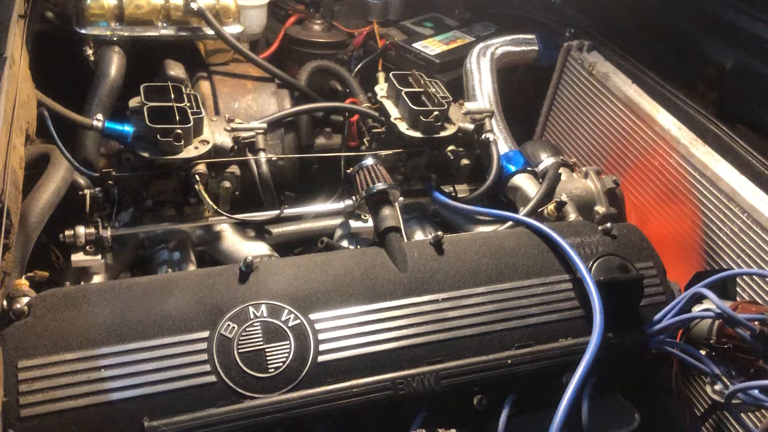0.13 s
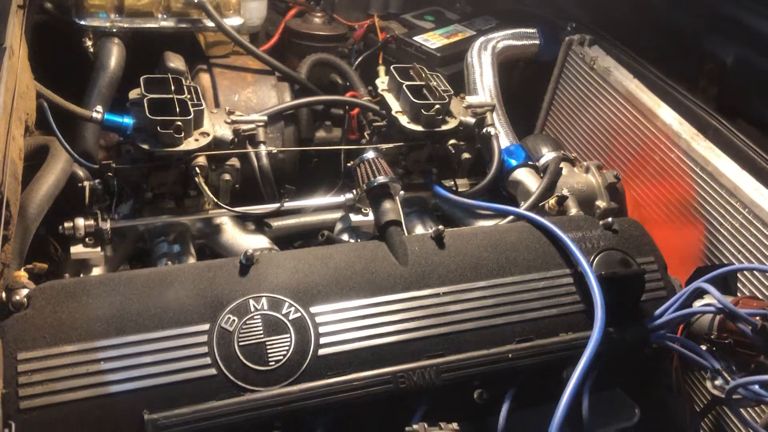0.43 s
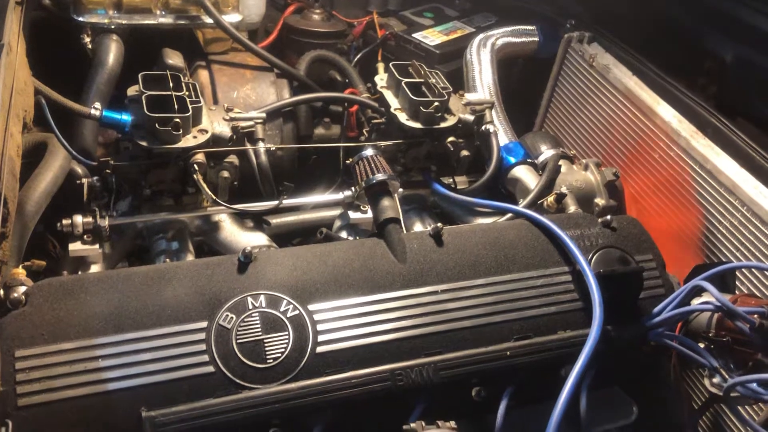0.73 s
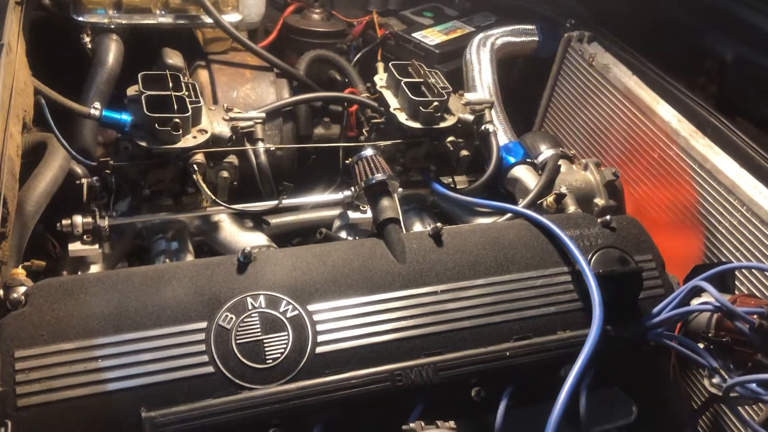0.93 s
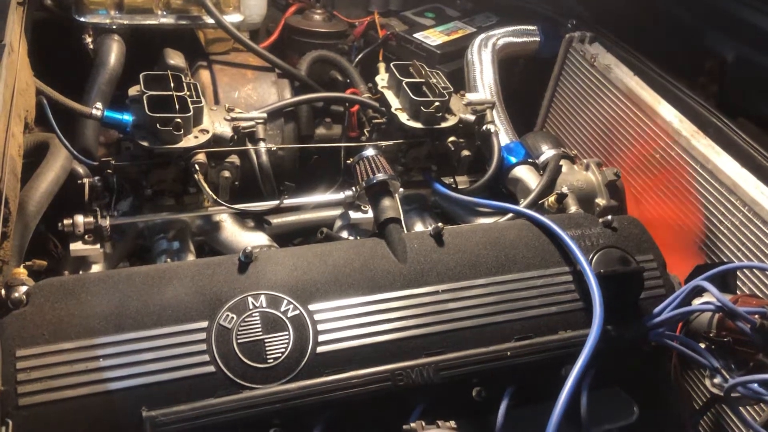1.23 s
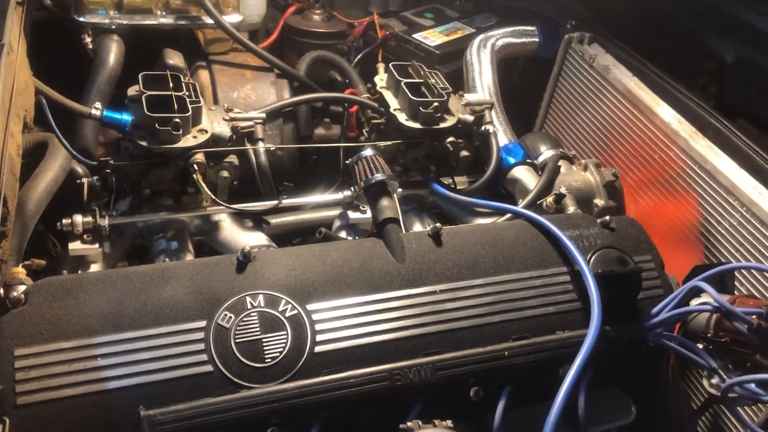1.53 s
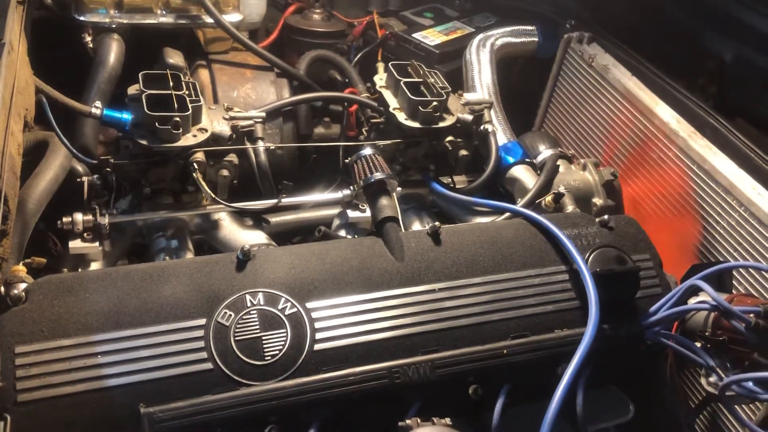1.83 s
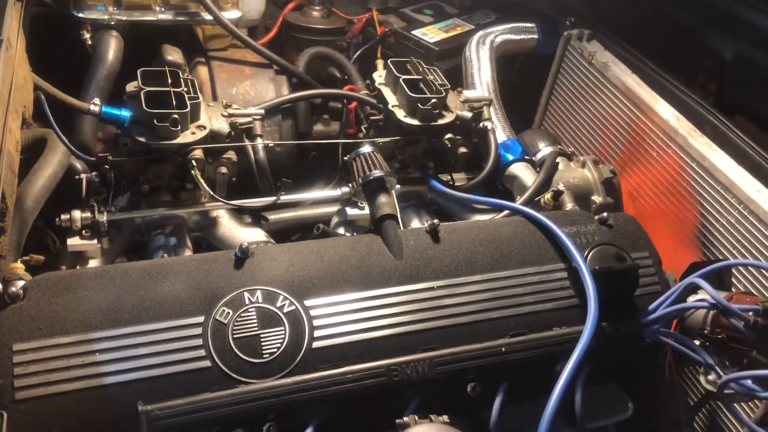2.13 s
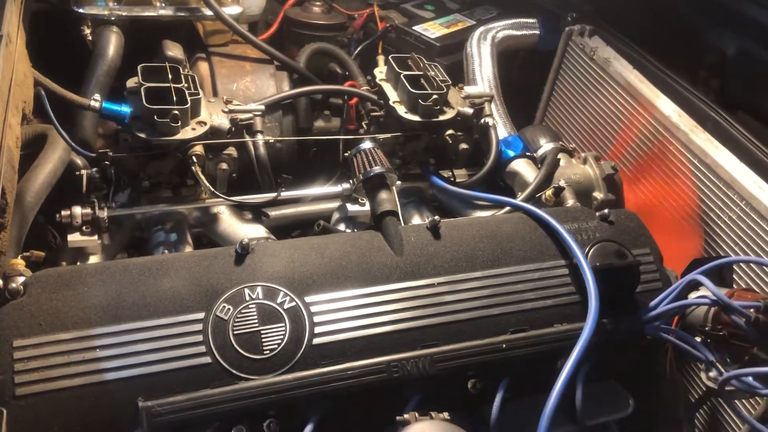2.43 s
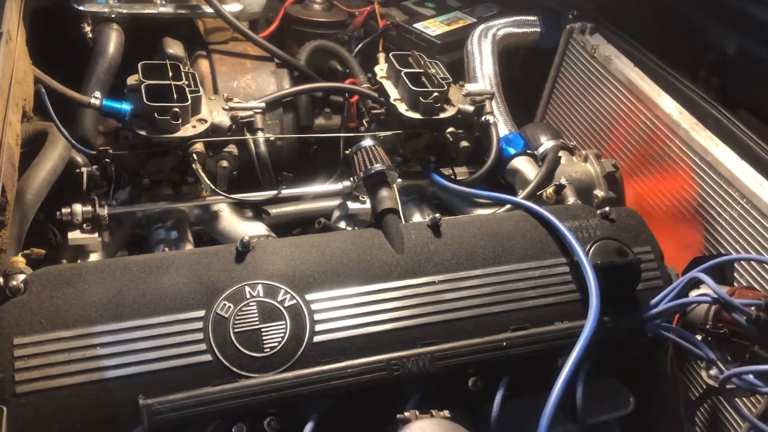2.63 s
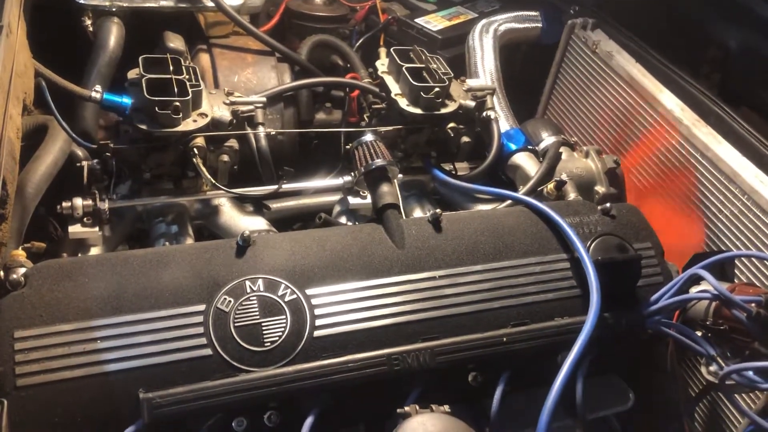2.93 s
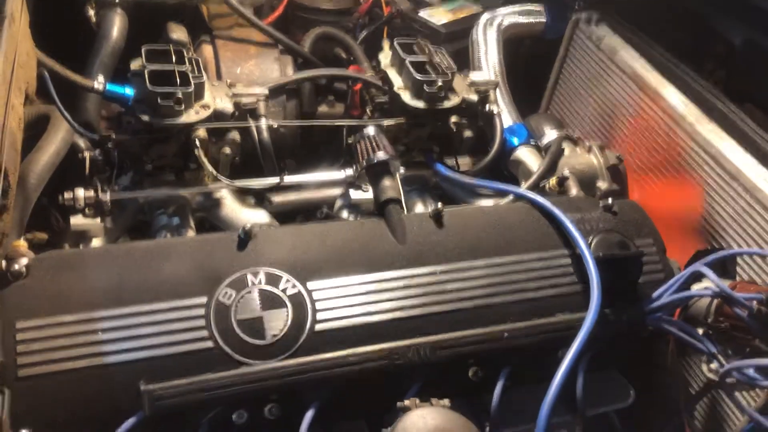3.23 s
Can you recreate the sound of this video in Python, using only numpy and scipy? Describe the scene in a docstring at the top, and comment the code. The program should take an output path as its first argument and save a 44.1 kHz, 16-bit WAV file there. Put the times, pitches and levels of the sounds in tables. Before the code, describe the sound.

Six-cylinder petrol engine idling unevenly, bassy and humming, with a loose tappet clicking steadily up close.

```python
"""After a moment of silence a six-cylinder petrol engine idles near 930 rpm, close over the open engine bay.
It sags deeply before 1 s and lightly near 2.2 s, recovers each time, runs fastest near 3 s and slows at the end.
Exhaust multiples throb in the bass, uneven pushes ring the bay, and panels hum at pitches of their own.
Noise bursts and ringing modes make the valve ticks, in a pattern that repeats every two crank turns, led by one
loose tappet; cam lobes rub with short, gritty chirps over the coloured noise of belts, fan and intake."""
import sys
import numpy as np
from scipy import signal
from scipy.fft import rfft, irfft
from scipy.io import wavfile
from scipy.ndimage import uniform_filter1d

SR = 44100
rng = np.random.default_rng(int(sys.argv[2]) if len(sys.argv) > 2 else 0)


def log_audio(samples):
    """Write samples as a 16-bit WAV file to the path given in sys.argv[1]."""
    # one column per channel
    frames = np.atleast_2d(samples).T
    # limit to full scale, then quantise
    limited = np.clip(frames, -1, 1)
    pcm = np.round(limited * 32767).astype(np.int16)
    wavfile.write(sys.argv[1], SR, pcm)


N = 149940
T = np.arange(N) / SR  # time, s

IDLE_RPM = 930  # nominal speed
THROB_AT = 0.587  # place of the strongest exhaust pulse in the cycle (0-1)
TICK_SAME = 0.31  # share of a tick's power that is the same on every blow

# swell of the bass and of the lower panel tones: start_s, level_db
BASS_LEVEL = [(0.15, 2.5), (0.45, -0.5), (0.68, 2), (0.76, -3.5), (0.84, 4.5), (1.1, 1), (1.3, 0.5),
              (1.5, 3), (1.6, 0.5), (1.72, 2.5), (2.0, 0), (2.25, 0.5), (2.45, 0.5), (2.7, 0.5),
              (2.9, -0.5), (3.2, 2), (3.3, -3.5), (3.38, 0.5)]


def undb(db):
    """Turns decibels into an amplitude factor."""
    return 10 ** (np.asarray(db) / 20)


def unit(x):
    """Scales a signal to rms 1."""
    return x / np.sqrt(np.mean(x ** 2))


def curve(points):
    """Joins (s, value) points by straight lines."""
    return np.interp(T, *np.array(points).T)


def walk(rate):
    """Random levels held about 1 / rate s and slewed twice; spread near 1."""
    hold = int(SR / rate)
    steps = np.repeat(rng.standard_normal(N // hold + 1), hold)
    slewed = uniform_filter1d(uniform_filter1d(steps, hold), hold)
    return 1.6 * slewed[:N]


def noise(points, tilt_db=0):
    """Noise of rms 1 with a colour of (Hz, dB) points, tilted per octave."""
    hz, db = np.array(points, float).T
    octave = np.log2(np.fft.rfftfreq(N, 1 / SR) + 1)  # + 1 Hz keeps the log finite
    gain = undb(np.interp(octave, np.log2(hz), db + tilt_db * np.log2(hz)))
    return unit(irfft(rfft(rng.standard_normal(N)) * gain, N))


def resonate(x, hz, width):
    """A steep resonance: one band-pass applied twice."""
    b, a = signal.iirpeak(hz, hz / width, fs=SR)
    return signal.lfilter(b, a, signal.lfilter(b, a, x))


def pulses(times, sizes):
    """One impulse per time."""
    out = np.zeros(N)
    inside = (times > 0) & (times < T[-1])
    np.add.at(out, (times[inside] * SR).astype(int), sizes[inside])
    return out


def passes(cycle, place):
    """The times at which the engine reaches one place in its cycle."""
    return np.interp(np.arange(-1, 28) + place, cycle, T)


def whirr(cycle, rpm):
    """Belts, fan and intake rush as coloured noise, pulsing slightly with the firings and following the speed."""
    # colour of the rush: pitch_hz, relative level_db
    rush_colour = [(200, -0.5), (400, 2.5), (500, 2), (660, -3), (810, 4.5), (960, -1), (1100, 3),
                   (1190, 4), (1270, 6), (1430, -2), (1620, 1), (1900, -6), (2050, -7), (2350, -9),
                   (2500, -5.5), (2750, -9), (3000, -9.5), (3800, -14), (5200, -16), (6800, -20),
                   (7250, -18), (7900, -24), (10600, -30), (11300, -26.5), (12000, -31), (13000, -40),
                   (15500, -41)]
    firing = np.cos(2 * np.pi * 6 * cycle)  # six firings a cycle
    speed_db = 0.014 * (rpm - IDLE_RPM)
    level_db = -35.5 + 0.5 * firing + speed_db + 0.8 * walk(70)
    return undb(level_db) * noise(rush_colour)


def panels():
    """Bonnet and panels ring at their own pitches whatever the speed; the upper ones swell and fade together."""
    # narrow ringing before the swell: pitch_hz, level_db (rms)
    panel_tones = [(121, -27.5), (168, -24.5), (260, -47), (285, -42.5), (336, -41.5)]
    # swell of the upper tones: start_s, level_db
    upper_swell = [(0.15, 2), (0.36, 6), (0.6, 0.5), (0.78, -13), (0.95, 3.5), (1.12, 2.5), (1.25, -5.5),
                   (1.47, 3.5), (1.7, -4), (1.87, -3.5), (2.0, 2.5), (2.2, -3), (2.4, 2), (2.64, 5.5),
                   (2.8, -6), (2.97, 1), (3.15, 5), (3.3, -2.5)]
    wander_hz, waver_db = 4, 2.4
    out = 0
    for hz, db in panel_tones:
        swell_db = curve(upper_swell if hz > 200 else BASS_LEVEL)
        turns = np.cumsum(hz + wander_hz * walk(44.93)) / SR + rng.random()
        level = undb(db + swell_db + waver_db * walk(25.09))
        out = out + np.sqrt(2) * level * np.sin(2 * np.pi * turns)
    return out


def boom(cycle):
    """Uneven firings and turbulent gas excite the resonances of the bay."""
    # air and panel resonances of the bay: pitch_hz, width_hz, relative level_db
    bay_modes = [(40.4, 12.3, -8), (63.2, 23.6, -3), (120, 24.3, 2), (143.6, 13, -14), (176.4, 25, -2),
                 (194.8, 9.6, -5.5), (228, 20, -17.5), (257.4, 15, -22), (291, 60, -29), (349, 43, -28)]
    boom_db, turbulence = -21.5, 0.7  # turbulence is its rms beside firings of rms 1
    times = np.concatenate([passes(cycle, THROB_AT + k / 6 - 1) for k in range(6)])
    firings = unit(pulses(times, rng.standard_normal(len(times))))
    push = firings + turbulence * rng.standard_normal(N)
    ringing = sum(undb(db) * resonate(push, hz, width) for hz, width, db in bay_modes)
    return undb(boom_db) * unit(ringing)


def cavity_db(hz):
    """How far the cavities lift a tone of this pitch."""
    # broad cavity resonances: pitch_hz, width_hz, lift_db
    cavities = [(123, 26, 5), (167.5, 22, 12)]
    return sum(db / (1 + (2 * (hz - centre) / width) ** 2) for centre, width, db in cavities)


def throb(cycle, rpm):
    """The steady part of the exhaust pulses: cycle-rate multiples that swell as they glide through the cavities."""
    # exhaust tones at idle speed, before the bass swell: multiple of the cycle rate, level_db (rms)
    exhaust_tones = [(6, -30.5), (8, -36.5), (12, -28), (14, -39), (15, -33.5), (16, -34), (18, -21),
                     (20, -41.5), (21, -22), (22, -29), (23, -38), (24, -39.5), (25, -45.5), (36, -58.5)]
    waver_db = 1.4
    out = 0
    for multiple, db in exhaust_tones:
        # a cycle is two crank turns, so its rate in Hz is rpm / 120
        lift_db = cavity_db(multiple * rpm / 120) - cavity_db(multiple * IDLE_RPM / 120)
        level = undb(db + lift_db + waver_db * walk(5.94))
        out = out + level * np.cos(2 * np.pi * multiple * (cycle - THROB_AT))
    return np.sqrt(2) * out


def cam(cycle):
    """Six times a cycle a lobe wipes its rocker with a brief, gritty chirp."""
    # cam lobe rubs: place in the cycle (0-1), pitch_hz, level_db before scatter
    lobe_rubs = [(.015, 1813, -38), (.2, 1785, -38), (.36, 1690, -39), (.555, 1803, -38.5),
                 (.71, 1698, -40.5), (0.894, 1846, -35.5)]
    rub_s, grit_share = 0.0027, 0.31  # width (sigma) of a wipe; grit beside a tone of rms 1
    window = signal.windows.gaussian(SR // 20 + 1, rub_s * SR)
    out = 0
    for place, hz, db in lobe_rubs:
        times = passes(cycle, place)
        wipes = pulses(times, undb(1.0 * rng.standard_normal(len(times))))  # 1 dB of scatter
        swell = signal.fftconvolve(wipes, window, "same")
        pitch = hz * (1 + 0.015 * walk(60))
        tone = np.sqrt(2) * np.sin(2 * np.pi * np.cumsum(pitch) / SR)
        grit = unit(resonate(rng.standard_normal(N), hz, 420))
        out = out + undb(db) * swell * unit(tone + grit_share * grit)
    return out


def blows(cycle, rpm, place):
    """One valve's blows: a little uneven, and harder when the engine runs faster."""
    scatter_db, jitter_s, db_per_rpm = 1.5, 0.0002, 0.0109
    times = passes(cycle, place)
    late, hard = rng.standard_normal((len(times), 2)).T
    speed_db = db_per_rpm * (np.interp(times, T, rpm) - IDLE_RPM)
    return pulses(times + jitter_s * late, undb(scatter_db * hard + speed_db))


def strike(hits, colour, envelope):
    """Blows that fade along an envelope: partly the part's own dense ring, partly fresh rattle."""
    ring = signal.fftconvolve(hits, envelope * colour[:len(envelope)])[:N]
    rattle = signal.fftconvolve(hits, envelope)[:N] * colour
    return np.sqrt(TICK_SAME) * ring + np.sqrt(1 - TICK_SAME) * rattle


def valves(cycle, rpm):
    """The lighter valves each give a short, bright tick: noise of their own colour with a fast rise and fade."""
    # valve ticks: place in the cycle (0-1), level_db before scatter, decay_ms, tilt in dB per octave
    valve_ticks = [(0.028, -35.5, 5, -4.5), (0.184, -36, 6.1, 2.5), (.215, -56, 2.6, -8),
                   (.325, -41.5, 3.9, -1), (0.354, -37.5, 3.5, 3.5), (.517, -48.5, 2.9, 2),
                   (.54, -41.5, 3.8, 11.5), (.63, -38.5, 7.6, -4), (0.684, -35.5, 6.1, 1),
                   (0.717, -33, 6.4, -5), (.853, -38, 3, -2), (.88, -37.5, 2.8, 1)]
    # shared colour of the ticks: pitch_hz, relative level_db
    tick_colour = [(500, -26), (1500, -1), (2600, 2.5), (3300, 3), (4300, -2.5), (5600, -1), (7200, -5.5),
                   (7900, -8), (8700, -6.5), (11500, -17), (13000, -21), (15500, -27)]
    rise_s = 0.00086
    age = T[:SR // 20]
    out = 0
    for place, db, decay_ms, tilt_db in valve_ticks:
        envelope = np.exp(-1000 * age / decay_ms) * (1 - np.exp(-age / rise_s))
        hits = blows(cycle, rpm, place)
        out = out + undb(db) * strike(hits, noise(tick_colour, tilt_db), envelope)
    return out


def tappet(cycle, rpm):
    """The loose tappet cracks once a cycle, spills into the bay and rings the decaying modes of the cam cover."""
    # colour of the crack: pitch_hz, relative level_db
    crack_colour = [(500, -5), (1200, -2), (2100, -8.5), (3200, 1), (4000, 2.5), (5000, -2.5), (6300, 2),
                    (7900, -7), (11000, -10), (13000, -14), (15500, -36)]
    # modes of the cam cover: pitch_hz, t60_s, level_db before waver
    cover_modes = [(766, 0.031, -43), (1091, 0.23, -37), (1270, 0.083, -36), (1460, 0.038, -35.5),
                   (2516, 0.058, -34), (2534, 0.055, -45), (3963, 0.023, -39), (3997, 0.031, -33),
                   (5360, .03, -44), (6330, 0.023, -44), (7180, 0.037, -50)]
    crack_db, crack_s, spill_db, spill_s = -36.5, 0.0018, -38.5, 0.0087  # levels and decay times
    hits = blows(cycle, rpm, 0)
    age = T[:SR // 10]
    crack = undb(crack_db) * np.exp(-age / crack_s)
    spill = undb(spill_db) * np.exp(-age / spill_s)
    out = strike(hits, noise(crack_colour), crack + spill)
    for hz, t60, db in cover_modes:
        pole = np.exp((2j * np.pi * hz - np.log(1000) / t60) / SR)
        turned_hits = hits * np.exp(2j * np.pi * walk(8))  # a wandering phase for the blows
        ringing = signal.lfilter([1], [1, -pole], turned_hits).imag
        out = out + undb(db + 2.7 * walk(7.6)) * ringing
    return out


def scene():
    """One crank speed drives exhaust, valve gear and whirr; the panels keep their own pitches."""
    # crank speed: start_s, speed_rpm
    crank_speed = [(0.12, 929), (0.4, 951), (0.6, 949), (0.72, 845), (0.82, 801), (0.98, 920), (1.28, 922),
                   (1.45, 945), (1.7, 942), (2.02, 933), (2.2, 892), (2.44, 952), (2.8, 972), (3.08, 975),
                   (3.4, 913)]
    first_tick_s = 0.168  # first loud tick of the tappet
    nearing_db_per_s = 0.25  # the valve gear grows slightly as the microphone edges closer
    rpm = curve(crank_speed)
    cycle = np.cumsum(rpm) / (2 * 60 * SR)  # one cycle is two crank turns
    cycle = cycle - np.interp(first_tick_s, T, cycle)
    background = whirr(cycle, rpm) + panels()
    bass = (boom(cycle) + throb(cycle, rpm)) * undb(curve(BASS_LEVEL))
    gear = cam(cycle) + valves(cycle, rpm) + tappet(cycle, rpm)
    gear = gear * undb(nearing_db_per_s * (T - T.mean()))
    return (background + bass + gear)[None]


def record(dry):
    """The microphone opens after a moment of silence; the deepest bass and the top are cut."""
    start_s, fade_s, low_hz, top_hz = 0.12, 0.002, 32, 15750
    low_cut = signal.butter(12, low_hz, "high", fs=SR, output="sos")
    top_cut = signal.ellip(10, 0.2, 80, top_hz, fs=SR, output="sos")
    x = signal.sosfilt(low_cut, dry)
    x = x * np.clip((T - start_s) / fade_s, 0, 1)
    return signal.sosfilt(top_cut, x)


dry = scene()
out = record(dry)
log_audio(out)
```